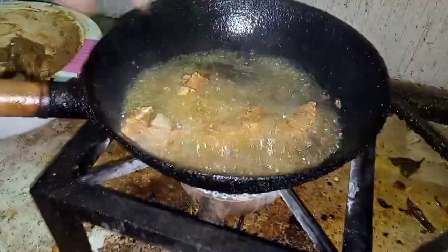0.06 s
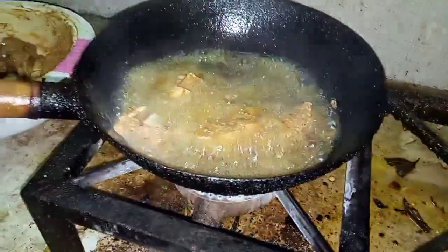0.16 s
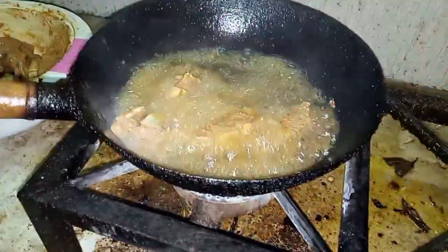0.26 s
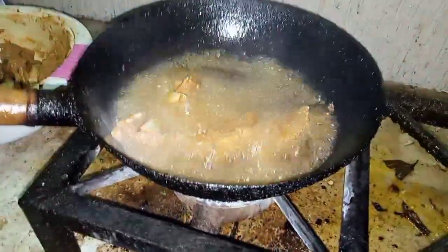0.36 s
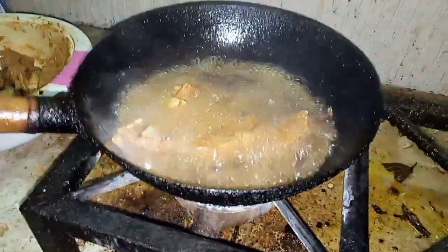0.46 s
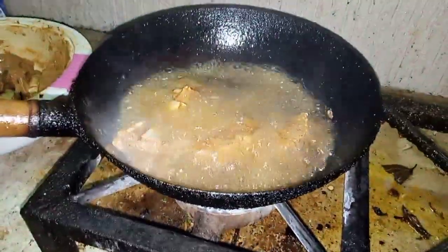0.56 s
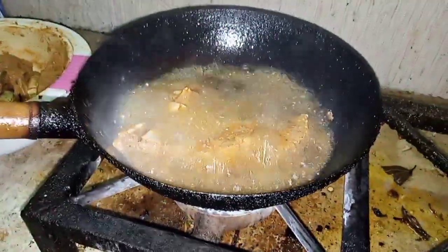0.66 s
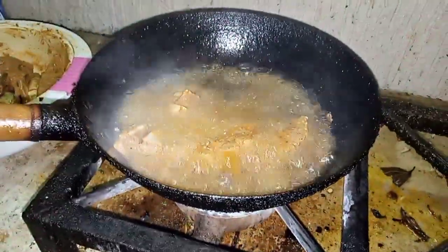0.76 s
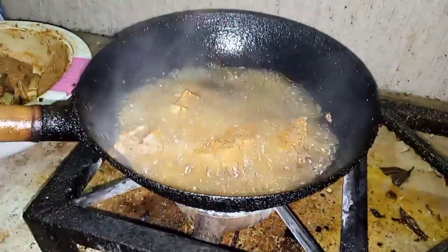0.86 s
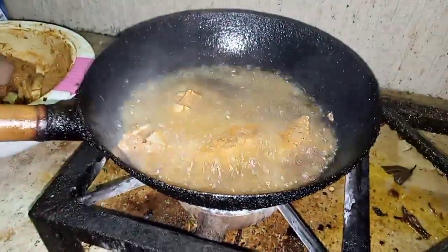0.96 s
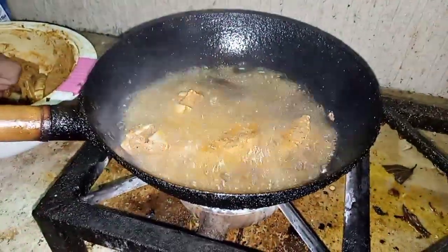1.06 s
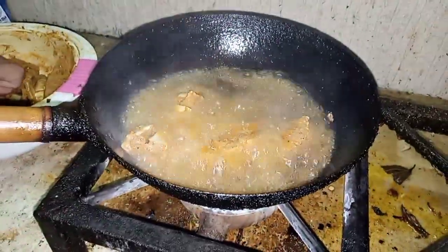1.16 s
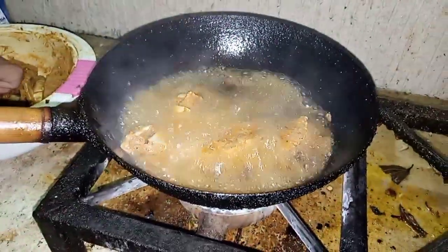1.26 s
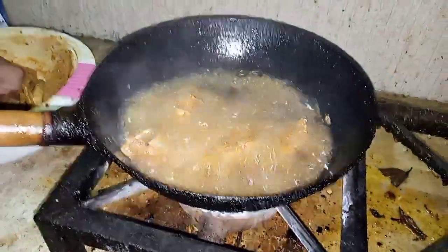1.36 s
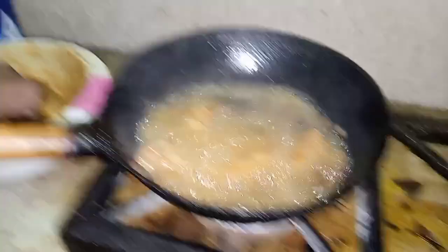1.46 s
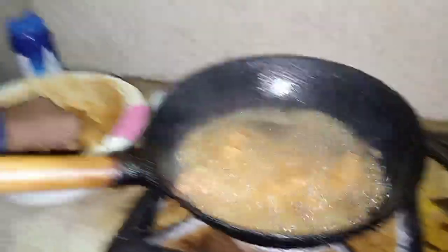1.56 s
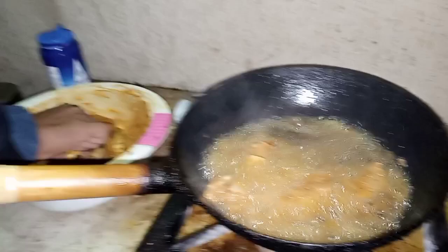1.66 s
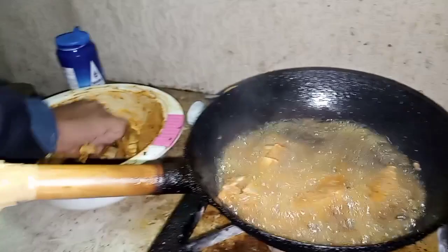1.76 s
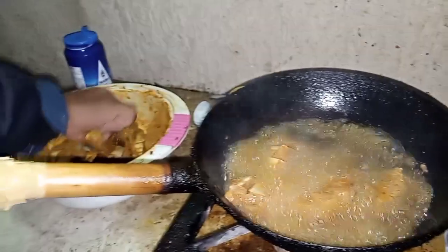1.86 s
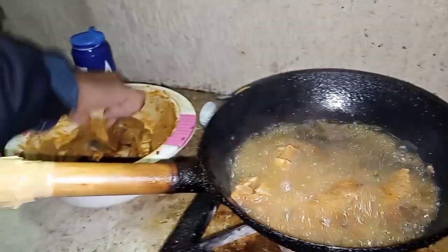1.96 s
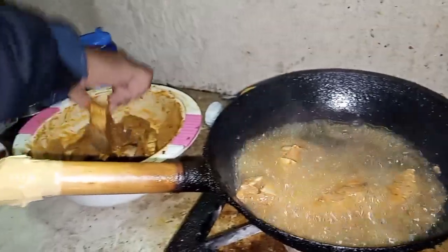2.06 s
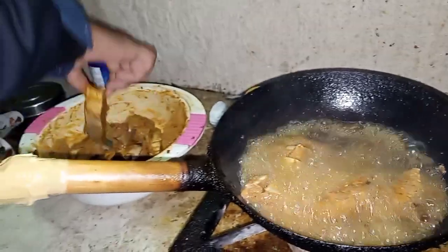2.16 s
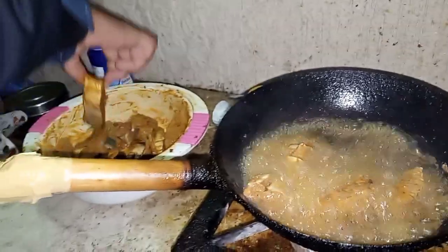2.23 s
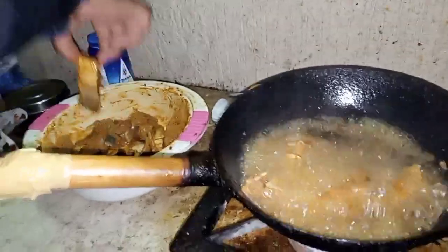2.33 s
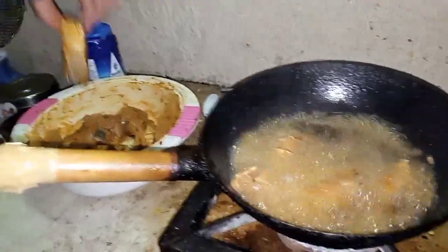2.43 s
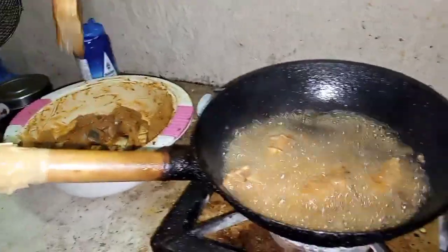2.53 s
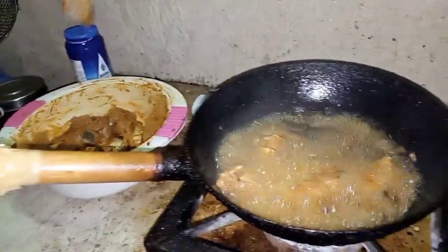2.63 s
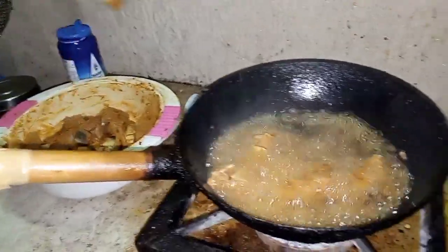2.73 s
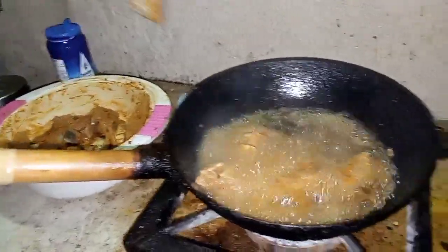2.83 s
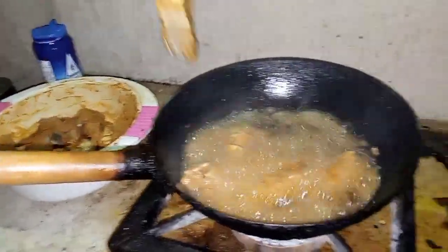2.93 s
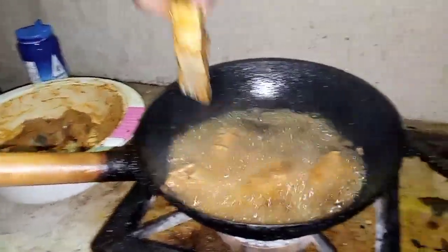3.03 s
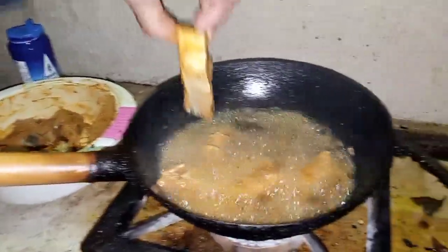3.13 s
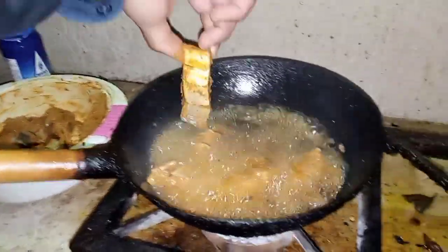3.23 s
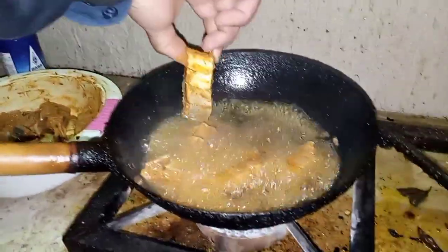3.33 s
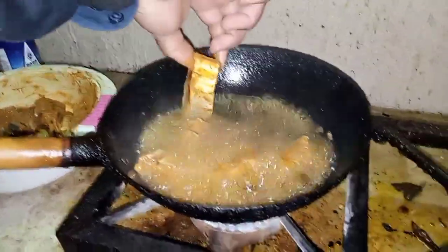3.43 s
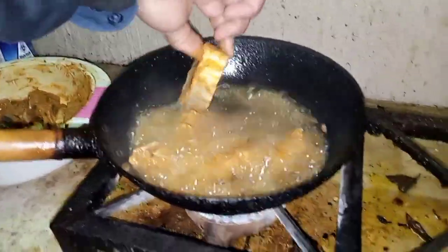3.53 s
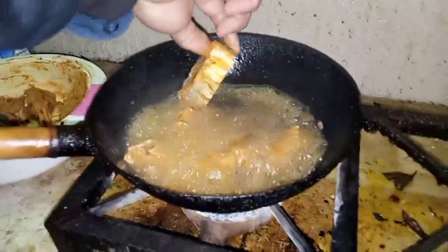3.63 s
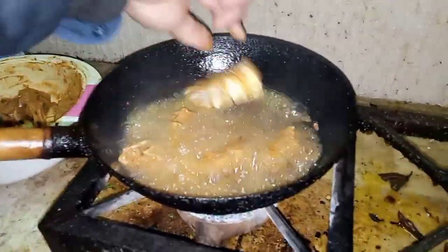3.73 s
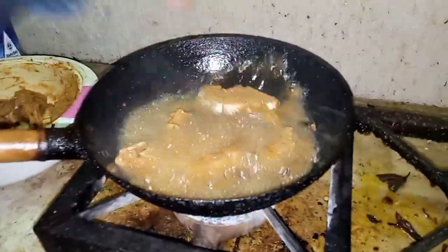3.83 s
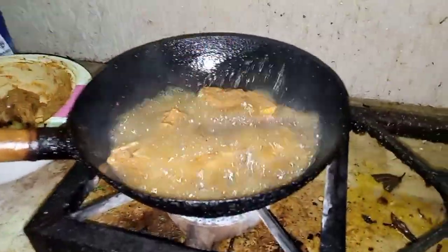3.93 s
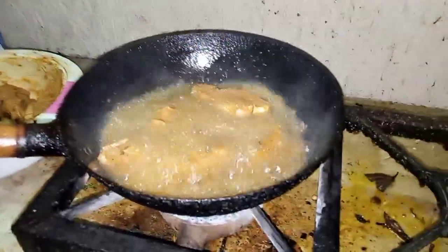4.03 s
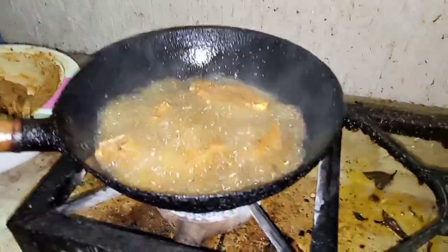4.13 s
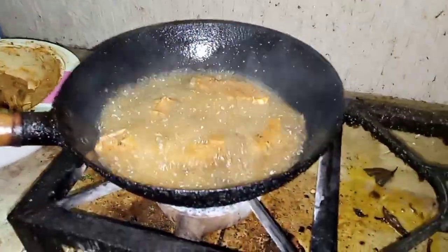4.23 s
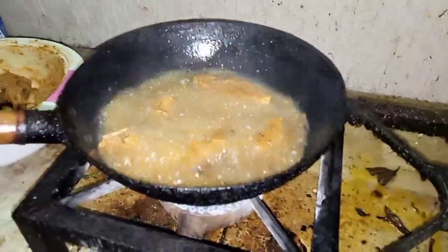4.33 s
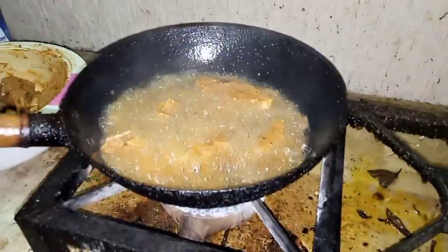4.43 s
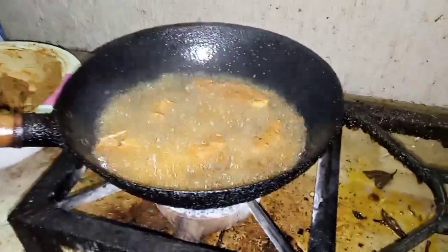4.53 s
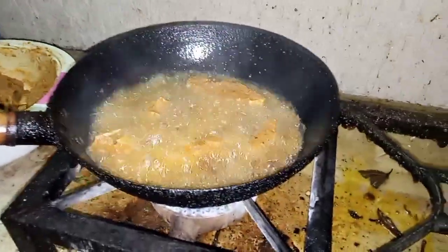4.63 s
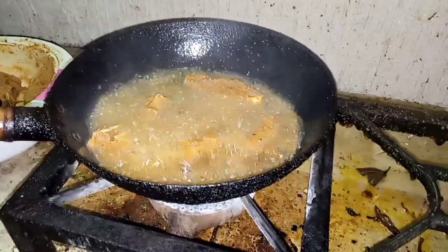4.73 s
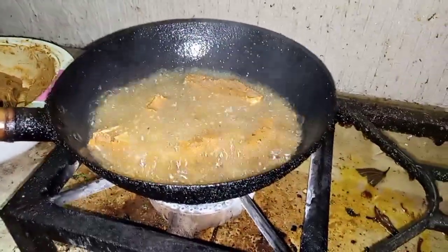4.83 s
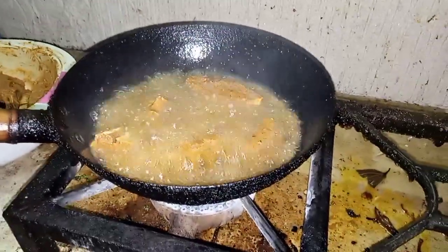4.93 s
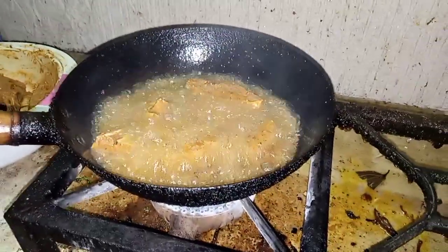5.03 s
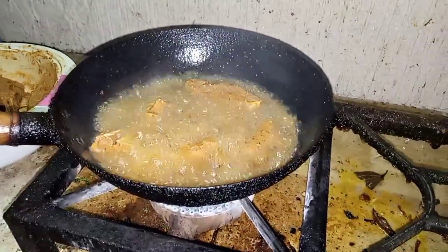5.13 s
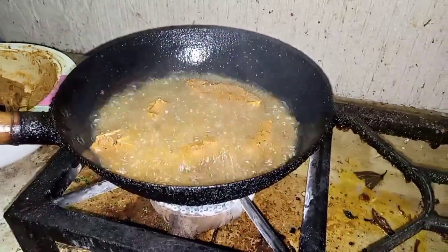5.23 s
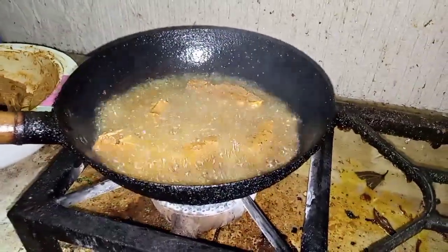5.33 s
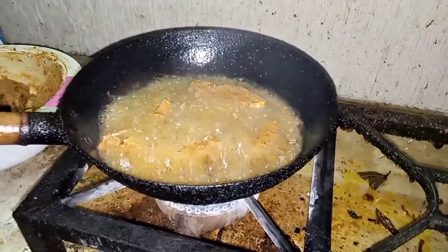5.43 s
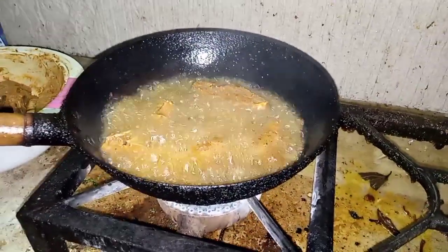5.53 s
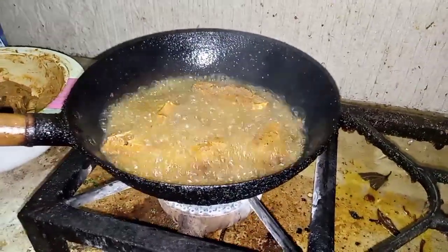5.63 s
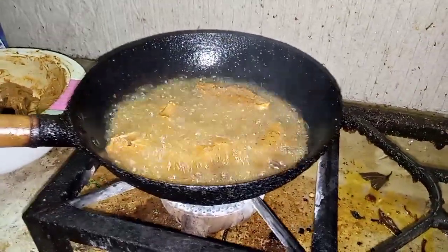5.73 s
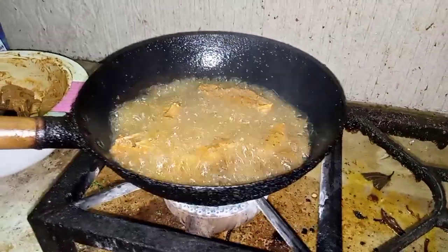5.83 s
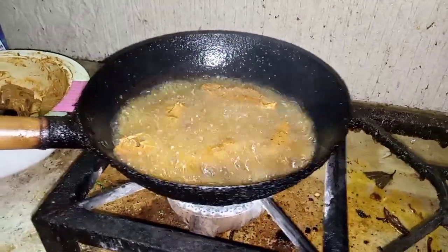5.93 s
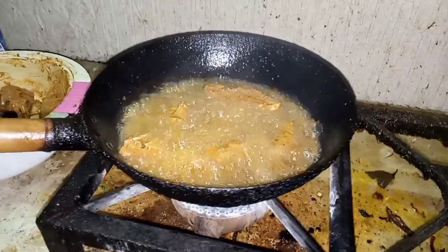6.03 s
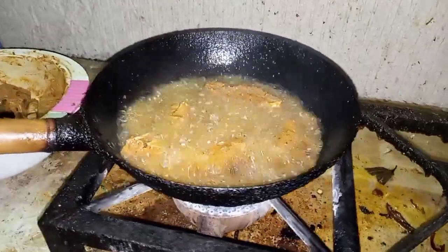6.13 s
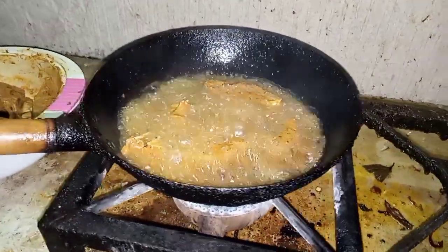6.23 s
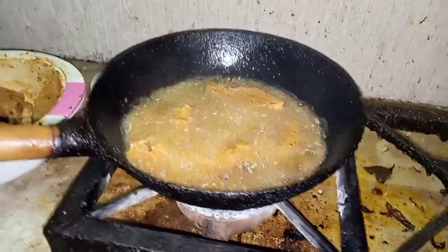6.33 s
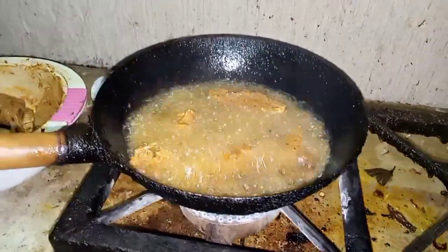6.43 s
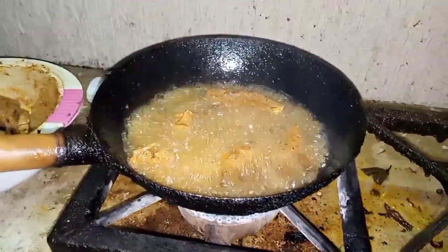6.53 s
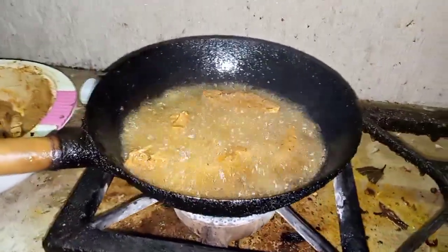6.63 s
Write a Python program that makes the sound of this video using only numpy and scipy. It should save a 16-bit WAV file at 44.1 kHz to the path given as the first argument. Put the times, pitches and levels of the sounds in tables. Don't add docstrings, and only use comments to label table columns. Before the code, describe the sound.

Food deep-fries in a metal pan on a gas burner. The fizzing oil stays continuous, scattered with clicks, pops and short whistling steam. The first half is lighter and more sparse; near four seconds the frying becomes much louder and denser, with a hard double dish knock and dull clatter. A few padded bumps come later as the frying gently settles. Phone microphone nearby, short room tail, faint hiss.

```python
import sys
import numpy as np
from scipy import signal
from scipy.fft import rfft, irfft, next_fast_len
from scipy.io import wavfile
from scipy.ndimage import uniform_filter1d

SR = 44100
rng = np.random.default_rng(int(sys.argv[2]) if len(sys.argv) > 2 else 0)


def inscribe(sig):
    pcm = np.round(np.clip(np.atleast_2d(sig).T, -1, 1) * 32767)
    wavfile.write(sys.argv[1], SR, pcm.astype(np.int16))


def ratio_of_db(decibels):
    return 10 ** (np.asarray(decibels, float) / 20)


N = 294588
SIZE = next_fast_len(N)
HZ = np.arange(SIZE // 2 + 1) * SR / SIZE
TIME = np.arange(N) / SR

# start_s, level_db, facing_db
BOIL = [(0.0, -37.5, -18), (0.299, -37, -23), (0.5, -37, -15), (0.85, -38, -12.5), (1.15, -36, -19),
        (2.45, -38.5, -18), (2.75, -38.5, -23), (3.1, -39, -18.5), (3.33, -38.5, -10.5), (3.65, -37.5, -5),
        (3.92, -33, -11.5), (4.25, -31, -15), (4.4, -28, -19), (4.5, -29.5, -9), (4.85, -29, -6.5),
        (5.82, -31, -7.5), (6.471, -33.5, -12.5), (6.68, -31.5, -11)]
# middle_s, length_s, level_db
GUSHES = [(0.08, 0.057, -1), (0.407, 0.16, -3.5), (1.117, 0.029, 3), (1.158, 0.056, -3), (3.042, .05, 4),
          (3.1, 0.054, 0), (3.724, 0.11, 4), (3.865, 0.073, 3.5), (4.165, 0.078, 5), (4.218, .05, -1),
          (4.34, 0.032, -3.5), (4.576, .1, -1), (4.64, 0.061, 2.5), (4.743, 0.14, -2), (4.792, 0.047, 3.5)]
# low_hz, high_hz
BUBBLE_RANGES = [(450, 2600), (2600, 5000), (5000, 11500), (11500, 16500)]
# size_spread_db, shared_swell_db, swell_rate_per_s, patch_db, patch_width_hz, patch_length_s
TEXTURE = [(3, 1.2, 11, 3.5, 29, 0.042), (3.5, 0.78, 51, 2.5, 62, 0.028), (2, 1, 33, 2.5, 200, 0.025),
           (3, 1.5, 60, 2, 1000, 0.015)]
# over_boil_db, gush_share, close_lift_db, dip_lift_db, facing_share
RANGE_MIX = [(-14, 0.41, 5.5, 3, 0.011), (-0.15, 1, 1.34, 0.5, 0.005), (-17, 0.39, 9, -0.5, 0.12),
             (0.3, .3, 1.5, -4, 0.95)]
# pitch_hz, level_db (per Hz)
NEAR = [(240, -46), (400, -23.5), (568, -31), (692, -23.5), (970, -23), (1200, -21), (1800, -19),
        (2040, -8), (2980, -13.5), (3790, -3.5), (5460, -14.5), (5940, -32), (6650, -26.5), (11500, -55.5),
        (15000, -66), (22000, -120)]
ASIDE = [(240, -48), (400, -29.5), (702, -20), (763, -19), (1360, -16), (2040, -14.5), (2160, -8),
         (2700, -16.5), (3200, 0), (3740, 1.5), (4420, -3.5), (4750, -13), (5000, -18.5), (5380, -25.5),
         (6280, -20.5), (8210, -41), (11500, -60), (15000, -75), (22000, -120)]
ABOVE = [(240, -68.5), (400, -41.5), (515, -31.5), (970, -25), (1250, -20.5), (1680, -22), (2350, -13.5),
         (2630, -16), (2940, -3), (3630, 2.5), (4490, -3.5), (4750, -10), (5000, -18.5), (5540, -27),
         (6740, -29), (8320, -47), (11500, -46.5), (15000, -89), (22000, -120)]
# pitch_hz, level_db (per Hz)
FIZZ = [(6470, -58), (11000, -31), (13400, -26), (14100, -10), (14600, -5.5), (14900, 3.5), (15400, 0.5)]
# leave_s, arrive_s
MOVES = [
    (.4, 2.24),
    (3.2, 4.17),
]
# pitch_hz, width_hz, boost_db
WOK = [(668, 53, 7.5), (1304, 95, 3), (1590, 190, 3), (2100, 40, 2), (2380, 77, 0.5), (3040, 28, 1.5),
       (3540, 31, 3)]
# start_s, length_s, pitch_hz, level_db
POCKETS = [(0.017, 0.1, 5420, -41.5), (0.258, 0.046, 6400, -52), (0.446, 0.025, 593, -59),
           (0.763, 0.033, 5400, -51), (0.995, 0.065, 5500, -47.5), (1.163, 0.062, 2150, -45.5),
           (1.43, 0.085, 720, -56.5), (1.439, 0.17, 6160, -56.5), (1.813, 0.036, 2200, -44.5),
           (2.046, 0.028, 4350, -38.5), (2.481, 0.027, 2200, -47), (2.76, 0.023, 1850, -45),
           (3.018, 0.038, 2330, -45), (3.018, 0.046, 3250, -38.5), (3.694, 0.028, 4370, -34),
           (3.375, 0.05, 1080, -55.5), (3.805, 0.047, 703, -48), (3.851, 0.022, 3070, -32),
           (4.008, 0.16, 2120, -39), (4.011, 0.057, 4630, -42), (4.173, 0.025, 6800, -50),
           (4.214, 0.029, 900, -47.5), (4.246, 0.047, 6140, -52), (4.263, 0.065, 1590, -45),
           (4.42, 0.05, 1440, -42.5), (4.591, 0.15, 518, -55.5), (4.736, 0.077, 713, -52),
           (5.16, 0.07, 707, -48), (5.16, 0.087, 2310, -40), (6.632, 0.08, 705, -55.5),
           (3.69, 0.076, 5530, -50), (3.69, .045, 6130, -53), (3.775, .06, 6800, -55),
           (3.785, .035, 6000, -50), (4.015, .04, 6340, -55), (4.055, 0.037, 5750, -55),
           (4.25, 0.055, 5500, -52), (4.455, .02, 6450, -54), (3.435, .05, 1560, -52),
           (3.57, 0.055, 1630, -59), (3.83, 0.052, 2060, -49), (3.88, .04, 1560, -46),
           (4.005, 0.082, 2500, -46), (4.045, 0.028, 2320, -44), (6.24, .03, 2280, -47),
           (6.49, .025, 1150, -50), (6.505, 0.04, 1500, -47), (6.58, 0.032, 1353, -53),
           (6.635, .03, 1660, -52), (3.945, .03, 7150, -56)]
# start_s, length_s, pitch_hz, width_hz, level_db
STREAMS = [(0.022, .34, 6600, 250, -55.5), (0.4, .03, 7600, 900, -56), (0.11, 0.21, 5000, 150, -52),
           (3.8, 0.055, 706, 67, -53), (5.48, 0.069, 522, 52, -55), (3.74, .11, 4870, 90, -43),
           (5.2, .1, 4400, 95, -42), (1.15, 0.052, 1676, 298, -51), (3.417, 0.35, 884, 67, -55),
           (3.427, 0.065, 2600, 90, -52), (3.576, 0.082, 2300, 66, -48.5), (3.608, 0.26, 689, 82, -50.5),
           (3.67, 0.22, 806, 50, -49.5), (3.72, .33, 1290, 80, -46), (3.4, 0.048, 1700, 84, -45),
           (4.1, 0.078, 2300, 83.33, -46), (5.1, 0.06, 1297, 80, -62), (4.7, 0.13, 1700, 75.6, -49),
           (3.6, 0.19, 696, 38, -53), (3.969, 0.18, 900, 42, -50), (4.6, 0.056, 1200, 64.81, -38.5),
           (4.35, 0.087, 2100, 60, -43), (4.423, 0.35, 2286, 70.5, -45), (4.46, 0.14, 1810, 85, -46),
           (4.5, .05, 1200, 90, -50), (4.43, .05, 850, 70, -53), (4.23, .06, 880, 60, -52),
           (4.29, .05, 1560, 70, -49), (3.71, .07, 1280, 120, -50), (4.6, .06, 2330, 90, -44),
           (1.33, .04, 6700, 200, -56), (4.145, .055, 5900, 900, -47), (5.045, .055, 1280, 90, -48),
           (4.75, .06, 1300, 110, -50), (.24, .1, 3950, 150, -42), (.17, .09, 3450, 150, -42),
           (.49, .04, 3850, 150, -43), (4.265, .04, 4600, 200, -39), (.1, .03, 2150, 150, -44),
           (.63, .07, 6500, 200, -57)]
# start_s, peak_db, pitch_hz
POPS = [(0.0378, -28, 3880), (0.0515, -17, 3720), (0.1695, -26, 4030), (0.183, -16, 3700),
        (0.7133, -18, 3380), (0.8929, -22, 3660), (1.0155, -19, 3350), (1.1124, -16, 3410),
        (1.316, -20, 3300), (1.539, -20, 4220), (1.764, -18, 3870), (2.0513, -22, 3530),
        (2.2463, -25, 3280), (2.4119, -20, 3740), (3.0165, -23, 2960), (3.0325, -20, 3350),
        (3.048, -18, 3340), (3.3792, -22, 3240), (3.685, -16, 3910), (3.8587, -15, 3020),
        (3.9095, -16, 3060), (3.9928, -23, 3520), (4.006, -17, 3280), (4.0285, -14, 3350),
        (4.125, -21, 3610), (4.1453, -19, 3860), (4.155, -17, 3800), (4.1784, -17, 3440),
        (4.2532, -13, 3540), (4.356, -19, 3360), (4.356, -15, 3460), (4.3937, -13, 3550),
        (4.4707, -19, 3620), (4.4867, -16, 3670), (4.59, -20, 3480), (4.6173, -12, 3720),
        (4.6463, -13, 3660), (4.6683, -17, 3570), (4.7775, -17, 3600), (4.8618, -19, 3400),
        (4.9486, -15, 3550), (5.11, -23, 3780), (5.1213, -23, 3340), (5.279, -14, 3100),
        (5.3727, -27, 3580), (5.4485, -21, 3530), (5.4884, -12, 3650), (5.5333, -22, 3640),
        (5.5712, -22, 3700), (5.7266, -20, 3600), (5.7389, -19, 3440), (5.9015, -22, 3850),
        (5.9743, -17, 3580), (6.038, -22, 3870), (6.0541, -14, 3730), (6.0911, -25, 4500),
        (6.0907, -21, 3820), (6.1599, -18, 3890), (6.4363, -27, 3400), (6.5006, -21, 4300)]
# start_s, peak_db, pitch_hz
EXTRA_POPS = [
    (1.1124, -19, 3350),
    (1.1225, -22, 3250),
]
# start_s, peak_db
SPITS = [(0.05, -50), (.165, -52), (0.3696, -49), (0.4459, -49), (0.7228, -46), (.77, -50), (.81, -50),
         (0.9238, -46), (1.225, -52), (1.385, -52), (1.6112, -49), (2.8814, -50), (3.3104, -42),
         (3.5593, -50)]
# pitch_hz, level_db, t60_s
DISH = [(110, -30.5, 0.44), (130, -17, .07), (201, -28, 0.075), (480, -12, .07), (300.5, -15.5, 0.16),
        (349, -13.5, 0.17), (589, -5.5, 0.077), (684, -5, 0.075), (848, -11.5, 0.12), (1068, -1.5, 0.077),
        (1144, 7, 0.029), (1250, -17, .07), (1560, -10.5, 0.15), (1982, -11, 0.11)]
STAND = [(110, -22, 0.37), (156, -12.5, 0.33), (197.6, 12, 0.078), (249, -9.5, 0.17), (300, -16, 0.18),
         (382.4, -13.5, 0.13)]
# start_s, level_db, contact_s, brightness_db (per octave)
DISH_BLOWS = [
    (4.1216, -22, 0.0015, 0.3),
    (4.132, -25, 0.0035, -0.5),
    (4.161, -51, .002, -11),
    (4.178, -46, .006, -8),
]
STAND_BLOWS = [
    (5.144, -37, 0.017, -10),
    (5.158, -37.5, 0.024, 22),
    (5.205, -40, 0.02, 0),
    (5.424, -28, 0.023, -3.5),
    (5.489, -38, 0.028, -8),
    (5.551, -48, 0.025, -10),
    (5.26, -51, .02, 5),
    (5.585, -56, .02, -5),
]
# start_s, peak_db, pitch_hz
TAPS = [(0.311, -62, 104), (0.446, -47.5, 490), (0.733, -51.5, 474), (1.155, -53, 490), (1.188, -51, 211),
        (1.225, -56, 242), (1.378, -51, 94.2), (2.754, -71, 497), (3.329, -57, 156), (3.408, -52, 96),
        (3.549, -63, 100), (3.62, -58, 110), (3.749, -48, 106), (4.29, -49, 95), (4.527, -48, 102),
        (4.928, -53, 184), (6.251, -53, 110), (6.349, -57, 156), (6.574, -59, 101)]
# pitch_hz, level_db (per Hz)
BURNER = [(15, -61), (25, -18), (49, -14.5), (118, -7.5), (334, -10), (460, -9), (547, -5), (600, -19),
          (780, -29), (1320, -120)]
# pitch_hz, level_db (per Hz)
HISS = [(4410, -29), (7500, -3), (8090, -21), (8670, -10), (11600, -12), (13500, -6.5)]

BACK_OFF_S = (0.29, 1.27)
DIP_S = (3.2, 3.45, 4.2, 4.4)
DIP_CHURN, DIP_CROWD = 0.41, 25
PATCH_TOP = 2.4
TICKS_PER_S, TICK_SPREAD_DB = 200, 3
TICK_DB, TICK_MID_DB, TICK_TOP_DB = -20, -34, -9
WAVER_HZ, WAVER_SHARE = 59.6, 0.016
GLIDE_SHARE = 0.012
STRAY_COUNT, STRAY_HZ, STRAY_S = 60, (4500, 7400), (0.025, 0.07)
STRAY_DB, STRAY_TILT_DB = -16.5, -9
POP_T60_S, FROTH_DB, FROTH_T60_S = 0.0074, -24, 0.1
TAP_T60_S, KNOCK_LOW_HZ = 0.12, 95
RATTLE_DB, RATTLE_T60_S = -26.5, 0.39
RUMBLE_DB, RUMBLE_SHARE = -45, 0.76
ROOM_T60_S, ROOM_DB, ROOM_LOW_HZ = 0.21, -4.5, 255
HISS_DB, HISS_SHARE = -64.5, 0.27
LIMIT, TOP_HZ = 0.9, 15520


def unit(x):
    return x / np.sqrt(np.mean(x ** 2))


def walk(rate):
    k = int(SR / rate)
    held = rng.standard_normal(400)[np.arange(N) // k % 400]
    slewed = uniform_filter1d(uniform_filter1d(held, k), k)
    return unit(slewed - uniform_filter1d(slewed, 4 * k))


def colour(points):
    hz, db = np.transpose(points)
    cep = irfft(np.interp(np.log(HZ + 1), np.log(hz), db) * np.log(10) / 20, SIZE)
    cep[1:SIZE // 2] *= 2
    cep[SIZE // 2 + 1:] = 0
    return np.exp(rfft(cep))


def band(x, order, lo, hi):
    return signal.sosfilt(signal.butter(order, [lo, hi], "band", fs=SR, output="sos"), x)


def low_cut(x, order, hz):
    return signal.sosfilt(signal.butter(order, hz, "high", fs=SR, output="sos"), x)


def fade_in(length, rise_s):
    return np.sin(np.pi / 2 * np.clip(np.arange(length) / (rise_s * SR), 0, 1)) ** 2


def add(out, s, sound):
    i = max(int(s * SR), 0)
    out[i:i + len(sound)] += sound[:N - i]


def ring(modes, length):
    t = np.arange(int(length * SR)) / SR
    return sum(ratio_of_db(db - 60 * t / t60) * np.sin(2 * np.pi * hz * t) for hz, db, t60 in modes)


def boil():
    s, db, _ = np.transpose(BOIL)
    return np.interp(TIME, s, db)


def facing():
    s, _, db = np.transpose(BOIL)
    return np.interp(TIME, s, db)


def dipping(t):
    return np.interp(t, DIP_S, [0, 1, 1, 0])


def bursts(lo, hi, spread_db, swell, patch_db, width_hz, length):
    size = np.minimum(rng.exponential(size=N), 5)
    sparks = rng.standard_normal(N) * ratio_of_db(spread_db * size + swell)
    hz, frames, cells = signal.stft(sparks, SR, nperseg=1024, noverlap=768)
    patches = rng.standard_normal(cells.shape)
    for axis, reach in enumerate((width_hz / hz[1], length * SR / 256)):
        bell = np.exp(-0.5 * (np.arange(-30, 31) / (reach / 2.5)) ** 2)
        patches = signal.oaconvolve(patches, np.expand_dims(bell, 1 - axis), "same", axes=axis)
    patches -= patches[(hz > lo) & (hz < hi)].mean(axis=0)
    share = np.sqrt(np.clip(np.minimum(hz - lo, hi - hz) / 200 + 0.5, 0, 1))[:, None]
    churn = 1 + DIP_CHURN * dipping(frames)
    flare = ratio_of_db(patch_db * churn * np.minimum(unit(patches), PATCH_TOP))
    patched = signal.istft(cells * share * flare, SR, nperseg=1024, noverlap=768)[1]
    return rfft(patched[:N], SIZE)


def sizzle():
    gush = sum(db * np.cos(np.pi * np.clip((TIME - mid) / length, -0.5, 0.5)) ** 2
               for mid, length, db in GUSHES)
    close, dip = np.interp(TIME, BACK_OFF_S, [1, 0]), dipping(TIME)
    first, second = (np.interp(TIME, move, [0, 1]) for move in MOVES)
    places = [(1 - first, colour(NEAR)), (first - second, colour(ASIDE)), (second, colour(ABOVE))]
    bowl = ratio_of_db(sum(db / (1 + (2 * (HZ - hz) / width) ** 2) for hz, width, db in WOK))
    surge, out = walk(16), 0
    for k, (lo, hi) in enumerate(BUBBLE_RANGES):
        spread_db, swell_db, rate, *patch = TEXTURE[k]
        swell = swell_db * (0.53 * surge + 0.56 * walk(rate))
        steam = bowl * bursts(lo, hi, spread_db, swell, *patch)
        heard = places if k < len(BUBBLE_RANGES) - 1 else [(0.95, colour(FIZZ))]
        layer = sum(share * unit(irfft(steam * tone, SIZE)[:N]) for share, tone in heard)
        over_db, gushy, close_db, dip_db, aimed = RANGE_MIX[k]
        db = over_db + gushy * gush + close_db * close + dip_db * dip + aimed * facing()
        out = out + layer * ratio_of_db(boil() + db)
    return out


def ticks():
    when, size = rng.random((int(TICKS_PER_S * N / SR), 2)).T
    clicks = np.zeros(N)
    clicks[(when * N).astype(int)] = ratio_of_db(-TICK_SPREAD_DB * np.log(np.maximum(size, 0.04)))
    spectrum = rfft(clicks, SIZE)

    def snap(tone):
        return unit(irfft(spectrum * tone, SIZE)[:N])

    oil = colour(ABOVE)
    body = ratio_of_db(TICK_DB) * snap(oil) + ratio_of_db(TICK_MID_DB) * snap(oil * (HZ > BUBBLE_RANGES[2][0]))
    top = ratio_of_db(TICK_TOP_DB + facing()) * snap(colour(FIZZ))
    return ratio_of_db(boil()) * (body + top)


def strays():
    when, long, pitch = rng.random((STRAY_COUNT, 3)).T
    odds = np.cumsum(1 + DIP_CROWD * dipping(TIME))
    s = np.interp(when, odds / odds[-1], TIME)
    hz = STRAY_HZ[0] * (STRAY_HZ[1] / STRAY_HZ[0]) ** pitch
    tilt_db = STRAY_TILT_DB * np.maximum(np.log2(hz / 4000), 0)
    db = np.interp(s, TIME, boil()) + STRAY_DB + tilt_db
    return list(zip(s, np.interp(long, [0, 1], STRAY_S), hz, db))


def pockets():
    out = np.zeros(N)
    notes = [(s, length, hz, WAVER_HZ + WAVER_SHARE * hz, db)
             for s, length, hz, db in list(POCKETS) + strays()]
    for s, length, hz, width, db in notes + list(STREAMS):
        t = np.arange(int(length * SR)) / SR
        k = int(SR / width / 2)
        drive = rng.standard_normal((2, 16000))
        wobble = uniform_filter1d(uniform_filter1d(drive, k), k)[:, :len(t)]
        bend = 1 + GLIDE_SHARE * drive[0, -1] * (t / length - 1) / 2
        waver = 1.1 * wobble.std() + wobble[0] + 1j * wobble[1]
        note = np.real(waver * np.exp(2j * np.pi * hz * t * bend))
        edge = np.sin(np.pi * (t / length) ** 0.48) ** 0.65
        add(out, s, unit(note) * edge * ratio_of_db(db))
    return out


def pops():
    out, froth, puffs = np.zeros(N), np.zeros(N), np.zeros(N)
    t = np.arange(SR // 16) / SR
    for s, db, hz in list(POPS) + list(EXTRA_POPS):
        pop = ring([(hz, db + 5, POP_T60_S)], 0.04)
        add(out, s, pop * fade_in(len(pop), 0.0014))
        add(froth, s, ratio_of_db(db + FROTH_DB - 60 * t / FROTH_T60_S) * rng.standard_normal(len(t)))
    for s, db in SPITS:
        add(puffs, s, ratio_of_db(db - 2.5 - 60 * t / 0.02) * rng.standard_normal(len(t)))
    return out + 3 * band(froth, 5, 2900, 4600) + band(puffs, 2, 11500, 16000)


def knocks():
    out = np.zeros(N)
    for body, blows in ((DISH, DISH_BLOWS), (STAND, STAND_BLOWS)):
        for s, db, contact, bright_db in blows:
            modes = [(hz, level + bright_db * np.log2(hz / body[2][0]), t60) for hz, level, t60 in body]
            sound = ring(modes, 0.6)
            add(out, s, ratio_of_db(db) * sound * fade_in(len(sound), contact))
    for s, db, hz in TAPS:
        modes = [(hz, db - 2, TAP_T60_S), (0.72 * hz, db - 4, TAP_T60_S), (1.44 * hz, db - 8, TAP_T60_S)]
        sound = ring(modes, 0.4)
        add(out, s, sound * np.clip(np.arange(len(sound)) / (0.004 * SR), 0, 1))
    return low_cut(out, 4, KNOCK_LOW_HZ)


def rattle():
    t = np.maximum(TIME - DISH_BLOWS[0][0], 0)
    level = ratio_of_db(RATTLE_DB - 60 * t / RATTLE_T60_S + 4.5 * walk(71))
    return band(rng.standard_normal(N) * (t > 0) * level, 3, 120, 1250)


def room(events):
    t = np.arange(SR // 2) / SR
    tail = rng.standard_normal(len(t)) * ratio_of_db(-60 * t / ROOM_T60_S) * (t > 0.004)
    tail = low_cut(tail, 1, ROOM_LOW_HZ)
    return ratio_of_db(ROOM_DB) * signal.fftconvolve(events, tail / np.linalg.norm(tail))[:N]


def burner():
    lumps = bursts(0, 900, 1.5, 1.5 * walk(7), 4, 90, 0.07)
    rumble = unit(irfft(lumps * colour(BURNER), SIZE)[:N])
    return rumble * ratio_of_db(RUMBLE_DB + RUMBLE_SHARE * boil())


def distant_spray():
    noise = unit(irfft(rfft(rng.standard_normal(N), SIZE) * colour(HISS), SIZE)[:N])
    ride_db = HISS_SHARE * (boil() - boil().mean()) + 1.5 * walk(2.9)
    return noise * ratio_of_db(HISS_DB - 1 + ride_db)


def scene():
    events = pops() + knocks() + rattle()
    return (sizzle() + ticks() + pockets() + events + room(events) + burner())[None]


def band_limit(x):
    return signal.sosfilt(signal.butter(12, 16870, fs=SR, output="sos"), x)


def record(dry):
    held = LIMIT * np.tanh((dry + distant_spray()) / LIMIT)
    mix = irfft(rfft(held, SIZE) * np.clip((TOP_HZ - HZ) / 40, 0, 1), SIZE)[:, :N]
    return band_limit(mix)


dry = scene()
out = record(dry)
inscribe(out)
```